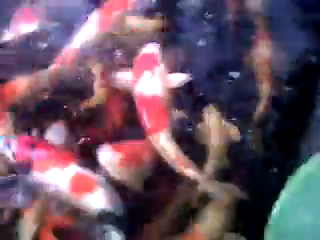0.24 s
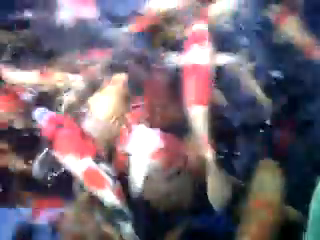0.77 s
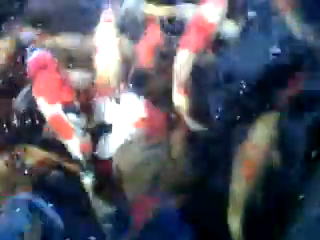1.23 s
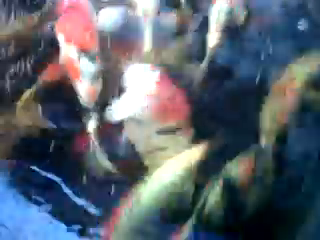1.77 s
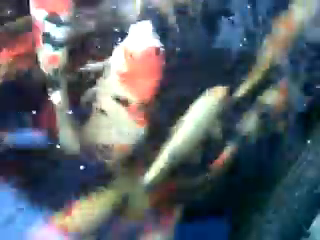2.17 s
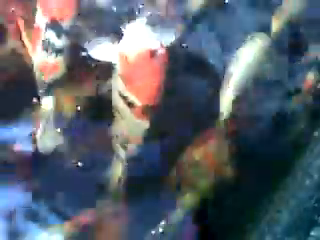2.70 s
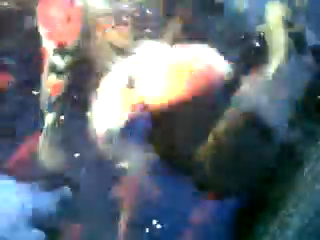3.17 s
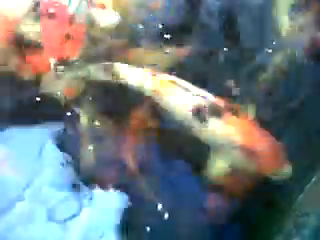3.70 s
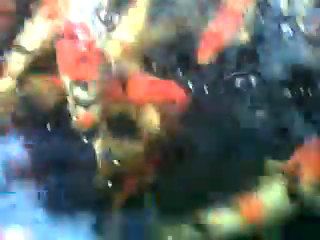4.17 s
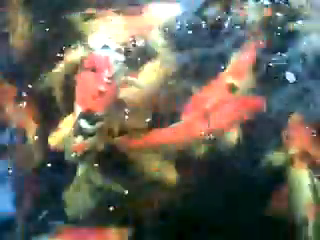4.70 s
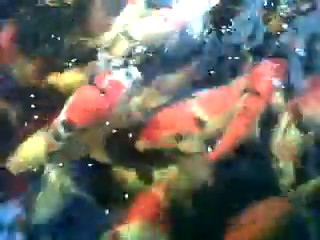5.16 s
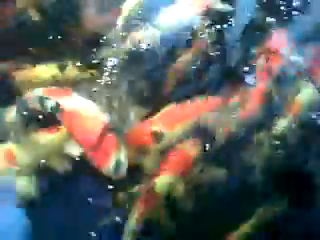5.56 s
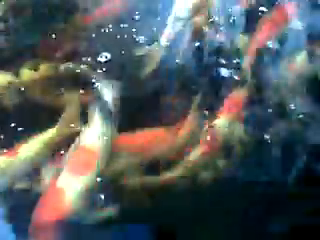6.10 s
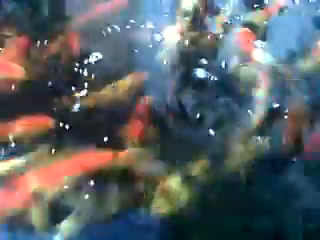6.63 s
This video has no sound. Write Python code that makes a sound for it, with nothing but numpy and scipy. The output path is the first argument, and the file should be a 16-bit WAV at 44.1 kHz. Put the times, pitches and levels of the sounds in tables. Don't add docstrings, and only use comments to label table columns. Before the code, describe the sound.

Outdoors at a pond, constant mid-pitched water rush and soft sloshing carry a hoarse, pipe-like tone that comes and goes. Over it, fish make short wet pops, flat slaps, chirping bubbles and tiny drop plinks, in uneven clusters with calmer gaps between. A pump hums low and a distant engine throbs faintly. The close sound is muffled, with little treble.

```python
import sys
import numpy as np
from scipy import signal
from scipy.fft import rfft, irfft, next_fast_len
from scipy.io import wavfile
from scipy.ndimage import uniform_filter1d, map_coordinates

SR = 44100
rng = np.random.default_rng(int(sys.argv[2]) if len(sys.argv) > 2 else 0)


def digitize_waveform(pressure):
    field = np.atleast_2d(pressure).T
    bounded = np.clip(field, -1, 1)
    quanta = np.round(bounded * 32767).astype(np.int16)
    wavfile.write(sys.argv[1], SR, quanta)


def voltage_ratio(decibels):
    exponent = np.asarray(decibels, float) / 20
    return 10 ** exponent


N = 302085

# t/s, peak level/dB, lower cavity f/Hz, t60/s
TAIL_SLAPS = [
    (0.8955, -17, 1002, 0.0046),
    (.944, -25, 896, 0.0091),
    (2.1533, -26, 392, 0.024),
    (2.5365, -20.5, 800, 0.0097),
    (2.6034, -25, 765, .013),
    (2.6155, -15.5, 1050, 0.0092),
    (2.9065, -27.5, 1410, 0.0074),
    (2.944, -23, 694, 0.024),
    (5.4136, -16.5, 983, .01),
]
# t/s, peak level/dB, cavity f/Hz, t60/s
MOUTH_SMACKS = [(.7282, -23.5, 812, 0.012), (.738, -27, 1120, 0.0098), (.9527, -23.5, 1145, .0054),
                (1.5481, -24, 1280, 0.016), (2.2013, -22, 807, .008), (2.5975, -31, 571, .016),
                (2.6103, -14.5, 1073, 0.0069), (2.6612, -33, 1014, 0.0168), (2.6756, -28.5, 1357, .013),
                (2.6852, -26, 1240, 0.018), (2.7937, -19, 1350, 0.0041), (3.338, -22.5, 1065, 0.021),
                (3.3997, -17, 1454, .006), (3.8109, -22.5, 1150, 0.0052), (5.4057, -13, 1950, 0.0056),
                (5.4152, -36, 1370, .008), (5.4477, -15.5, 1320, 0.0056), (5.5833, -25, 860, .016),
                (5.7854, -23.5, 1614, 0.014), (5.8034, -25, 1760, 0.013)]


def unit(x):
    return x / np.sqrt(np.mean(x ** 2) + 1e-20)


def along(points, hz):
    f, v = np.transpose(points)
    return np.interp(np.log(hz + 1), np.log(f + 1), v)


def curves(rows):
    s, *cols = np.transpose(rows)
    return [np.interp(np.arange(N) / SR, s, c) for c in cols]


def wobble(rate):
    coarse = np.arange(0, N + 32, 32)
    knots = rng.standard_normal(int(N * rate / SR) + 4)
    return np.interp(np.arange(N), coarse, map_coordinates(knots, [coarse * rate / SR]))


def coloured(x, spectrum):
    m = next_fast_len(N + SR // 4)
    gain = voltage_ratio(along(spectrum, np.fft.rfftfreq(m, 1 / SR)))
    return irfft(rfft(x, m) * gain, m)[:N]


def rush(spectrum, patchy_db):
    z = signal.stft(rng.standard_normal(N), nperseg=512)[2]
    field = uniform_filter1d(rng.standard_normal(z.shape), size=4, axis=0)
    field = uniform_filter1d(field, size=6, axis=1)
    patchy = signal.istft(z * voltage_ratio(patchy_db * unit(field)), nperseg=512)[1][:N]
    return unit(coloured(patchy, spectrum))


def add(track, s, sound):
    at = max(round(s * SR), 0)
    track[at:at + len(sound)] += sound[:len(track) - at]


def bubble(hz, half, rise, phase):
    t = np.arange(-half, half, 1 / SR)
    pitch = hz * 2 ** (rise * t / half)
    swell = np.cos(np.pi * t / half / 2) ** 2
    return swell * np.sin(phase + 2 * np.pi * np.cumsum(pitch) / SR)


def slaps():
    hits = []
    for row in MOUTH_SMACKS:
        purer_db = 12 * np.log2(row[2] / 1000)
        hits.append((*row, 1.536, -16.5 - purer_db))
    hits += [(*row, 1.75, 0.5) for row in TAIL_SLAPS]

    out, t = np.zeros(N), np.arange(SR // 16) / SR
    for s, db, hz, t60, upper, upper_db in hits:
        ring = np.sin(2 * np.pi * hz * t) + voltage_ratio(upper_db) * np.sin(2 * np.pi * upper * hz * t)
        onset = 1 - np.exp(-(t / t60 / 0.058) ** 2)
        ring = -ring * voltage_ratio(-60 * t / t60) * onset
        ring -= 0.34 * np.exp(-((t - .0005) / .00009) ** 2)
        band = signal.butter(2, [.7 * hz, 1.6 * hz], "band", fs=SR)
        spray = unit(signal.lfilter(*band, rng.standard_normal(len(t))))
        spray = spray * voltage_ratio(-21 - 60 * t / .08) * (1 - np.exp(-t / 0.0014))
        add(out, s, voltage_ratio(db + 2.5) * (ring / abs(ring).max() + spray))
    return out


def fallback(count):
    latest_s, under_slap_db, spread_octaves = 0.079, -23, .5
    out = np.zeros(N)
    for s, db, hz, _ in [*MOUTH_SMACKS, *TAIL_SLAPS]:
        for late, size, pitch, phase in rng.random((count, 4)):
            drop_hz = hz * 2 ** (spread_octaves * (2 * pitch - .7))
            plink = bubble(drop_hz, 6 / drop_hz, 0.38, 2 * np.pi * phase)
            add(out, s + .012 + latest_s * late, voltage_ratio(db + under_slap_db + 5.1 * size) * plink)
    return out


def gulps():
    # centre t/s, peak level/dB, centre f/Hz, half length/s
    rushing = [(0.414, -35, 726, 0.024), (0.447, -32, 560, .007), (0.4575, -31, 627, 0.0065),
               (.4755, -36, 590, .012), (0.5025, -39, 520, 0.014), (0.765, -36, 407, .015),
               (1.494, -41, 335, .015), (1.5544, -30, 720, .006), (1.86, -35.5, 754, 0.037),
               (1.964, -33.5, 597, .042), (1.931, -38, 330, .015), (2.1616, -37, 399, .016),
               (2.312, -46, 1037, .028), (2.5453, -41, 580, .028), (2.6295, -30, 1230, 0.011),
               (2.661, -28, 1470, 0.0045), (2.665, -28.5, 1482, 0.0073), (2.909, -26.5, 1590, 0.00392),
               (3.599, -35, 1060, .015), (5.4095, -20, 1450, .0031), (5.593, -41, 1510, 0.013),
               (5.6161, -42.5, 401, .028), (5.851, -31.5, 391, 0.0246), (5.929, -37.7, 1624, 0.017),
               (1.036, -42, 896, 0.016), (5.603, -41, 1400, .012), (5.639, -38, 1550, .012),
               (5.179, -36, 1780, .012)]
    # centre t/s, peak level/dB, centre f/Hz, half length/s
    lingering = [(.0295, -34, 718, .018), (.0485, -35.5, 686, 0.013), (.075, -41, 690, 0.016),
                 (2.005, -38, 800, .015), (.4566, -27.5, 372, .0078), (.742, -33, 520, 0.015),
                 (1.13, -41, 252, .015), (1.1859, -40, 444, .015), (1.3249, -37, 900, 0.0084),
                 (1.8766, -37.5, 250, .016), (1.447, -39, 1696, 0.052), (2.203, -45, 3020, .016),
                 (2.2126, -34, 980, 0.0085), (2.8231, -40, 506, 0.021), (3.45, -40, 194, .02),
                 (3.665, -28.5, 813, 0.00703), (3.9116, -41, 538, 0.026), (5.3138, -35, 638, 0.011),
                 (5.329, -29, 653, .022), (5.35, -34.5, 800, .015), (5.4512, -35.5, 497, .019),
                 (5.5076, -39, 314, 0.025), (5.5877, -31.5, 501, 0.013), (5.6667, -38.5, 519, .02),
                 (5.6719, -37, 813, .017), (5.8106, -36.5, 512, .017), (5.8616, -30, 430, .0086),
                 (5.8801, -36, 437, 0.014), (6.2346, -37, 972, .015), (6.46, -44.5, 241, 0.023)]
    # centre t/s, peak level/dB, f/Hz
    plinks = [(5.377, -48, 3870), (.5892, -33, 1780), (0.744, -35, 1580), (1.4433, -32, 1730),
              (1.52, -35, 1690), (5.409, -29, 2560), (2.196, -38, 2980), (2.667, -27, 1500),
              (2.6093, -28, 1350), (2.657, -26, 1310), (2.705, -34, 1245), (2.756, -39, 1600),
              (2.9147, -27.5, 1520), (3.0544, -36, 1780), (3.2195, -33.5, 1466), (3.259, -34, 1446),
              (3.4012, -32, 1880), (3.8243, -36, 1320), (3.9178, -36, 1320), (4.0682, -34, 1256),
              (4.9387, -35, 1777), (4.953, -37, 1750), (5.369, -39, 2714), (5.386, -34, 1440),
              (5.435, -41.5, 2800), (5.4442, -27.5, 1460), (5.5026, -29, 1590), (5.523, -38.5, 2489),
              (5.8138, -30, 1910), (5.9504, -35, 1870)]
    # centre t/s, peak level/dB, f/Hz
    ticks = [(.4906, -31.5, 807), (.7646, -27, 1320), (2.171, -36, 679), (1.222, -36, 1600),
             (4.935, -33, 820), (2.3112, -24, 1357), (4.641, -31, 900), (4.9278, -33, 630),
             (4.9468, -27, 1030), (5.4078, -27.5, 2740), (6.1341, -36, 430), (4.3, -43, 3800),
             (1.9, -47.5, 4800), (1.6, -47, 4800)]
    plink_cycles, tick_cycles = 9.8, 2
    gulp_rise, gurgle_rise, plink_rise = 0.837, 0.13, 0.083

    pockets = [(*row, gulp_rise) for row in rushing]
    pockets += [(*row, gurgle_rise) for row in lingering]
    pockets += [(s, db, hz, plink_cycles / hz, plink_rise) for s, db, hz in plinks]
    pockets += [(s, db, hz, tick_cycles / hz, plink_rise) for s, db, hz in ticks]
    out = np.zeros(N)
    for (s, db, hz, half, rise), chance in zip(pockets, rng.random(len(pockets))):
        add(out, s - half, voltage_ratio(db) * bubble(hz, half, rise, 2 * np.pi * chance))
    froth = voltage_ratio(1.3 * wobble(110)) + .22 * wobble(350)
    return out * voltage_ratio(-1.2) * froth


def patter(count, centre_hz, spread, cycles, size_db):
    out = np.zeros(N)
    for when, size, phase, (pitch, life) in zip(*rng.random((3, count)), rng.standard_normal((count, 2))):
        hz = centre_hz * 2 ** (spread * pitch)
        sound = bubble(hz, cycles * np.exp(.5 * life) / hz, 0.29, 2 * np.pi * phase)
        level_db = -size_db * np.log(1 - .98 * size)
        add(out, when * N / SR, voltage_ratio(level_db) * sound)
    return unit(out)


def water():
    # t/s, level/dB
    stir = [(0.0, -42.5), (0.76, -40), (1.14, -42), (1.6, -40), (1.91, -41.5), (2.1, -39), (2.42, -40.5),
            (2.76, -39), (3.05, -41.5), (4.08, -40), (4.58, -42), (5.21, -42), (5.55, -38), (5.74, -38.5),
            (5.95, -40), (6.39, -40.5), (6.52, -42.5), (6.85, -42.5)]
    # f/Hz, level/dB per Hz
    hiss_band = [(600, -31), (900, -9), (1240, -0.5), (1450, -2), (1750, -1), (2100, -7.5), (2400, -26),
                 (3000, -49.5)]
    # f/Hz, level/dB per Hz
    slosh_band = [(25, -32.5), (62, -22), (90, -4), (130, -5), (300, -6), (600, -2.5), (950, -2),
                  (1300, -10), (1800, -52.5)]
    # f/Hz,
    # level/dB per Hz
    fizz_band = [(1600, -35), (2300, -0.5), (3100, -2), (3850, -13), (5000, -21), (6300, -27), (6720, -37),
                 (6910, -25), (7100, -42.5), (7400, -81)]

    stir_db, = curves(stir)
    stir_db = stir_db - stir_db.mean()
    churn = wobble(7)
    hiss_drops = patter(count=1500, centre_hz=1389, spread=.35, cycles=3, size_db=2.0)
    hiss = rush(hiss_band, patchy_db=1.37) + voltage_ratio(-8.5) * hiss_drops
    slosh_drops = patter(count=500, centre_hz=564, spread=.6, cycles=3, size_db=3.5)
    slosh = rush(slosh_band, patchy_db=1.0) + voltage_ratio(-9.5) * slosh_drops
    fizz_drops = patter(count=400, centre_hz=2743, spread=0.14, cycles=5, size_db=4)
    fizz = rush(fizz_band, patchy_db=1.0) + voltage_ratio(-14) * fizz_drops

    hiss_db = -43.5 + 0.97 * stir_db + 0.75 * churn
    slosh_db = -47 + 1.2 * stir_db + .7 * churn
    fizz_db = -55 + 0.32 * wobble(1.8)
    return voltage_ratio(hiss_db) * hiss + voltage_ratio(slosh_db) * slosh + voltage_ratio(fizz_db) * fizz


def drain():
    # t/s, level/dB
    flow = [(0, -39.5), (.3, -56), (1.58, -55.5), (2.78, -43), (3.05, -48.5), (3.9, -41), (5.15, -58),
            (6.14, -52), (6.41, -38.5), (6.54, -53.5), (6.85, -40)]
    # f/Hz, level/dB per Hz
    air_column = [(500, -120), (900, -36), (1150, -6), (1240, 1.5), (1350, -2), (1700, -37.5), (3000, -120)]
    level_db = curves(flow)[0] - 6.5 + 0.87 * wobble(9)
    return voltage_ratio(level_db) * rush(air_column, patchy_db=-1.0)


def pump():
    # f/Hz, rms level/dB
    hum = [(50, -72), (100, -57.5), (150, -66.5), (200, -58), (250, -74), (301, -73.5), (1234, -67.5),
           (2203, -65.5), (3105, -73.5)]
    # f/Hz, rms level/dB
    supply = [(6864, -99), (6914, -94), (6963, -101)]
    out, t = np.zeros(N), np.arange(N) / SR
    for hz, db in [*hum, *supply]:
        level = np.sqrt(2) * voltage_ratio(db + 1.2 * wobble(2.7))
        out += level * np.sin(2 * np.pi * hz * t + 0.14 * wobble(1.8))
    return out


def engine():
    # t/s, level/dB, firing rate f/Hz
    idle = [
        (0, -58, 19.6),
        (.5, -52, 19.7),
        (2.2, -50.5, 19.5),
        (2.9, -48, 20),
        (3.4, -51, 19.8),
        (4, -56, 19.3),
        (5.5, -58.5, 18.5),
        (6.85, -58.5, 19.7),
    ]
    # multiple of the firing rate, level/dB
    harmonics = [(2, -16), (3, -14.5), (4, -3.5), (5, 4.5), (6, 4.5), (7, 1.5), (8, -4), (9, 2.5),
                 (10, -2.5), (12, -13)]
    level_db, rate_hz = curves(idle)
    turn = 2 * np.pi * np.cumsum(rate_hz * (1 + 0.01204 * wobble(1.5))) / SR
    orders = np.zeros(N)
    for k, db in harmonics:
        orders += voltage_ratio(db + 2.7 * wobble(2.1)) * np.sin(k * turn + 1.0 * wobble(4))
    return voltage_ratio(level_db - 2.5) * unit(orders)


def scene():
    # f/Hz, level/dB
    dull_mic = [(60, -41), (300, 0.5), (2400, -3), (3300, -11.5), (4000, -24), (7300, -61), (12000, -100)]
    near = coloured(slaps(), dull_mic) + coloured(fallback(count=3), dull_mic) + gulps()
    behind = water() + drain() + pump() + engine()
    return (near + behind)[None]


def top_cut(x):
    return signal.sosfilt(signal.butter(12, 7280, fs=SR, output="sos"), x)


def record(dry):
    return top_cut(dry)


dry = scene()
out = record(dry)
digitize_waveform(out)
```